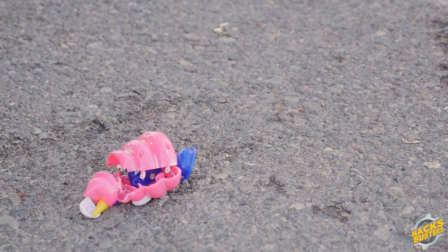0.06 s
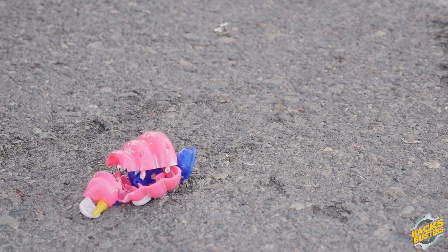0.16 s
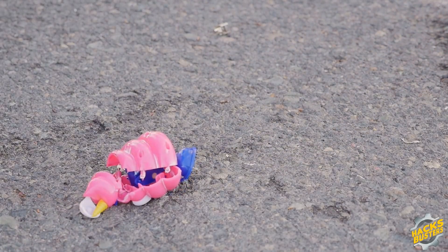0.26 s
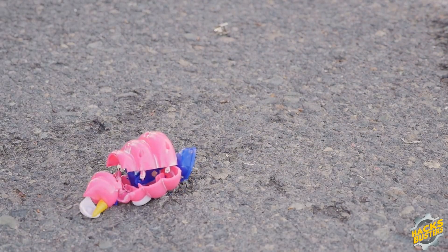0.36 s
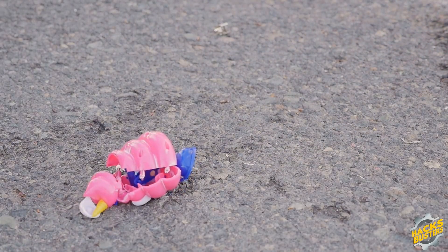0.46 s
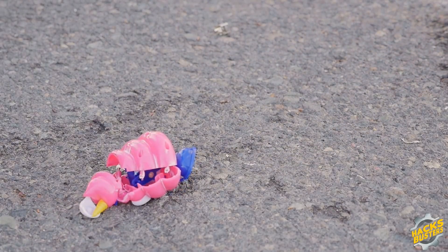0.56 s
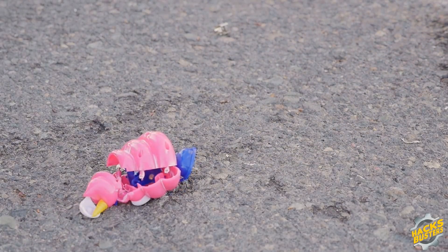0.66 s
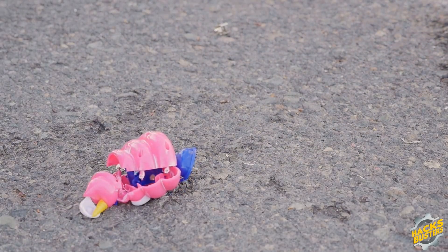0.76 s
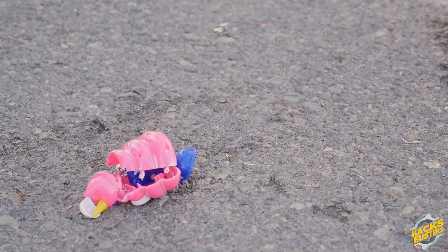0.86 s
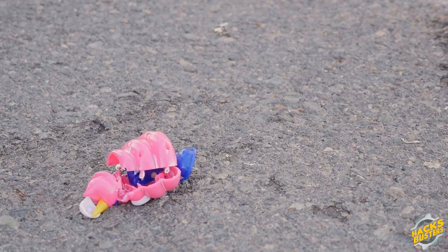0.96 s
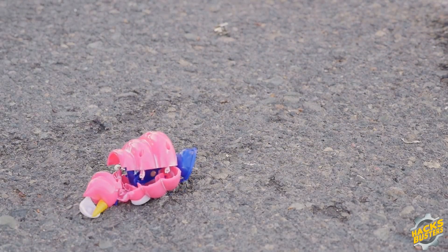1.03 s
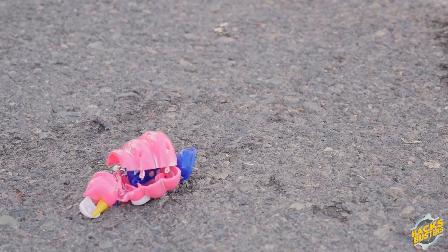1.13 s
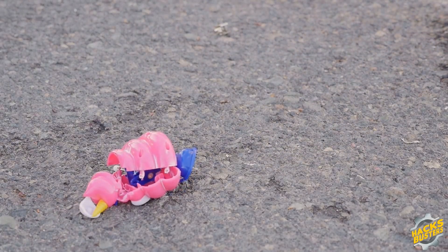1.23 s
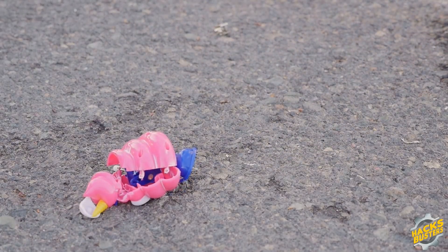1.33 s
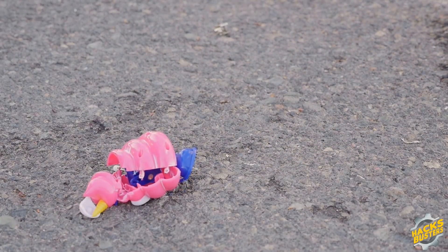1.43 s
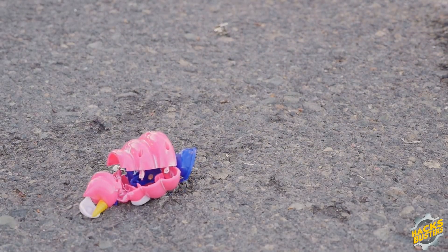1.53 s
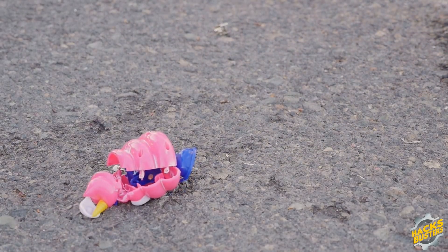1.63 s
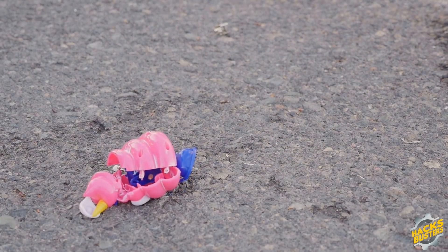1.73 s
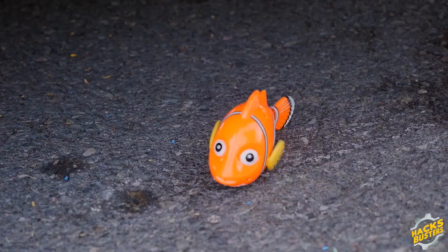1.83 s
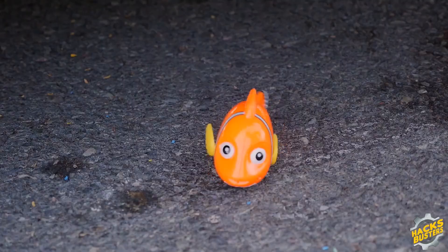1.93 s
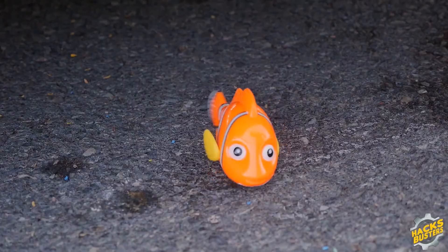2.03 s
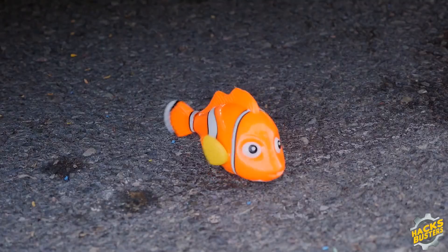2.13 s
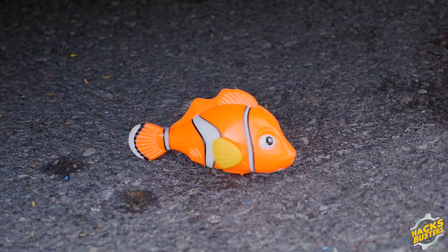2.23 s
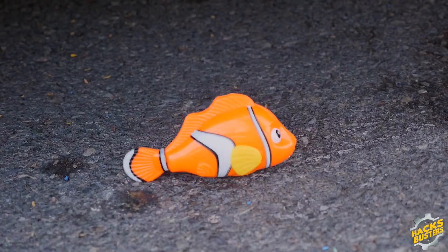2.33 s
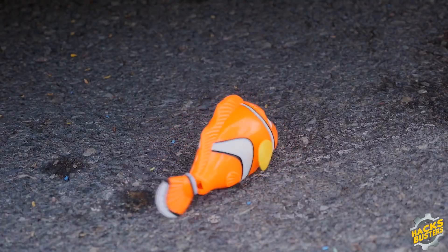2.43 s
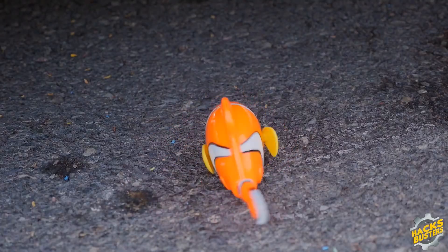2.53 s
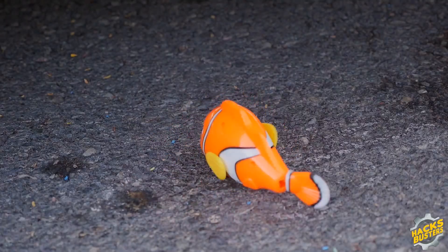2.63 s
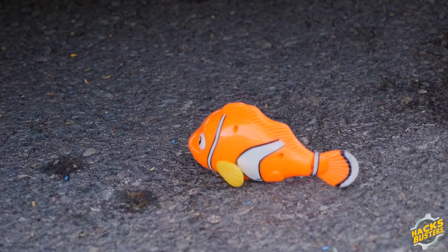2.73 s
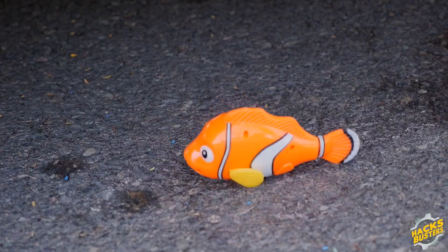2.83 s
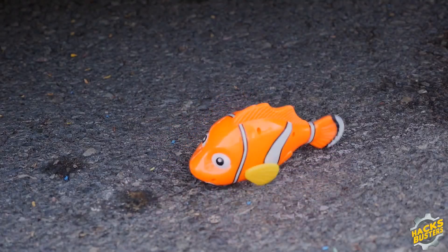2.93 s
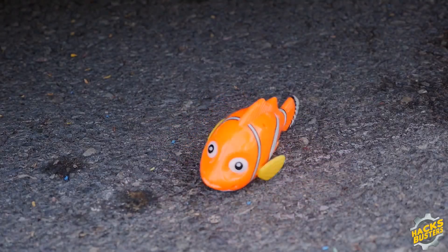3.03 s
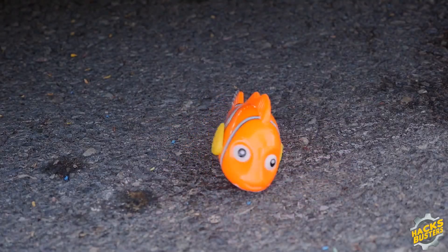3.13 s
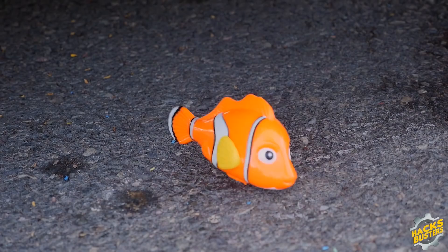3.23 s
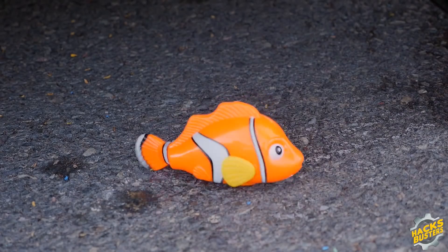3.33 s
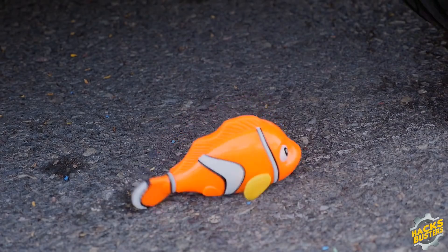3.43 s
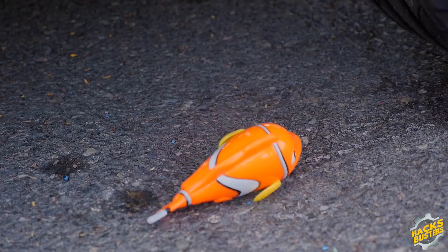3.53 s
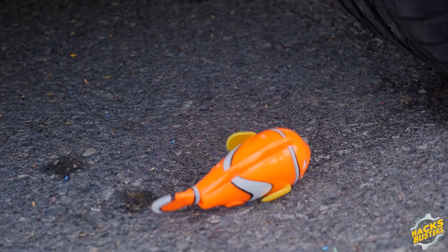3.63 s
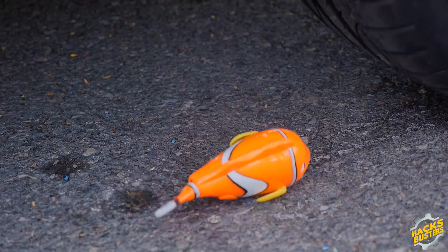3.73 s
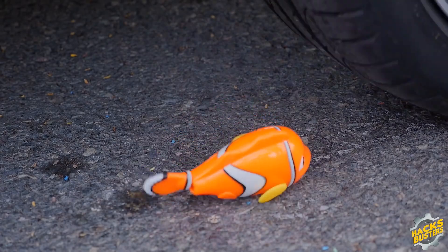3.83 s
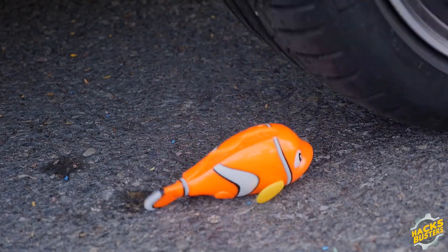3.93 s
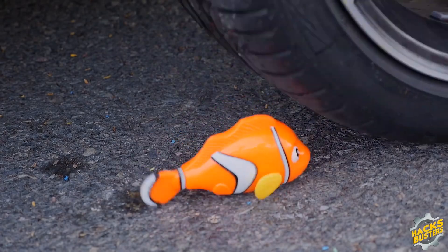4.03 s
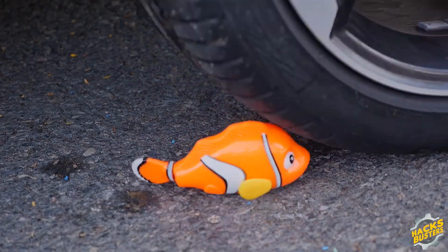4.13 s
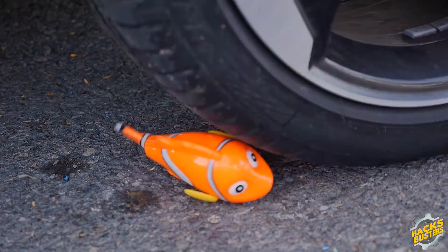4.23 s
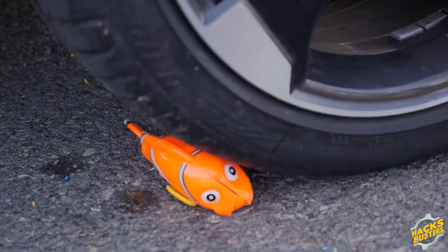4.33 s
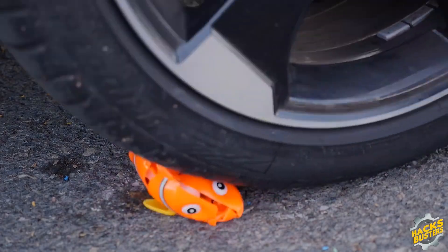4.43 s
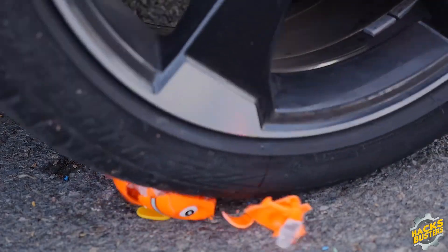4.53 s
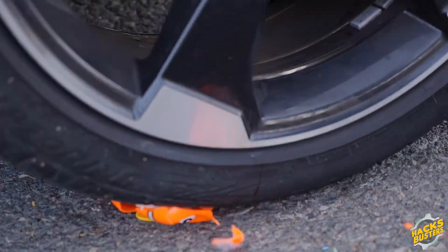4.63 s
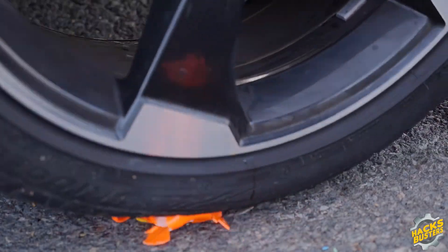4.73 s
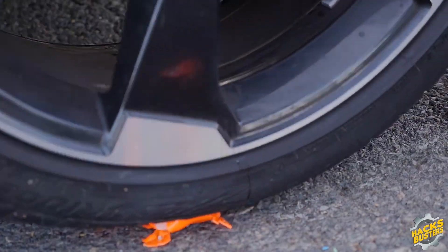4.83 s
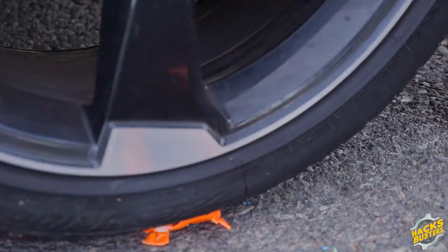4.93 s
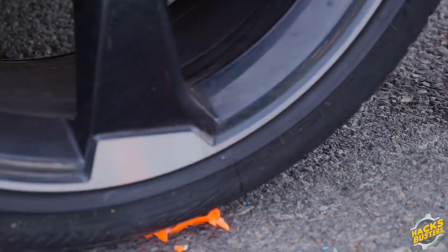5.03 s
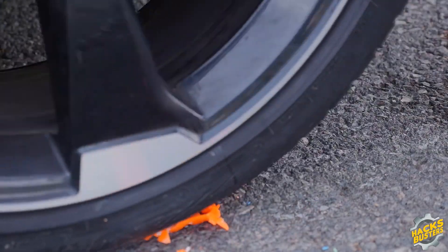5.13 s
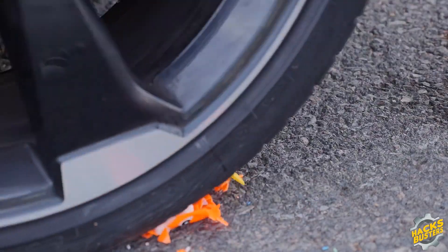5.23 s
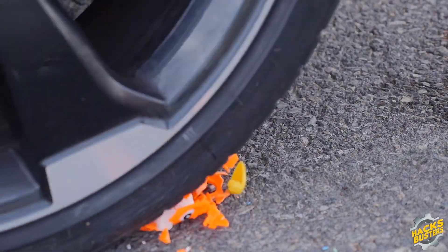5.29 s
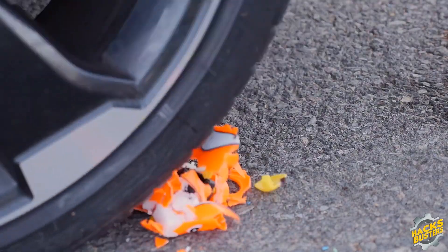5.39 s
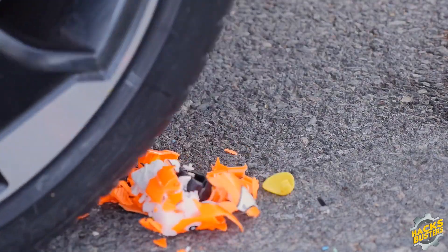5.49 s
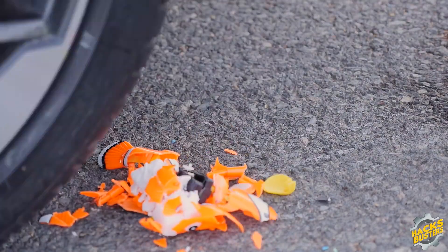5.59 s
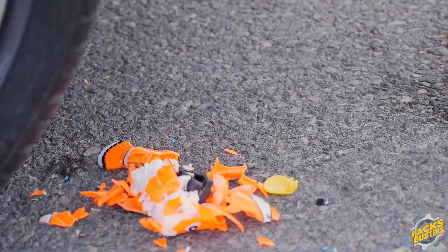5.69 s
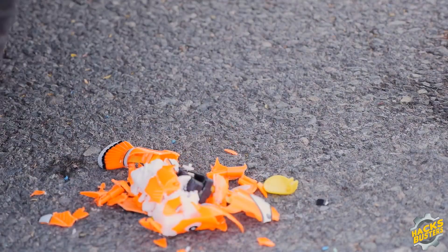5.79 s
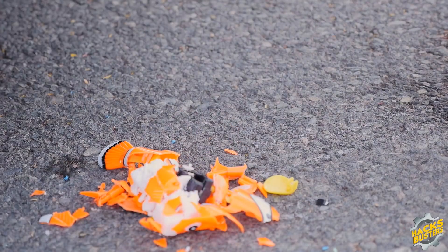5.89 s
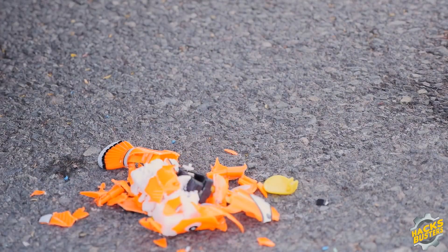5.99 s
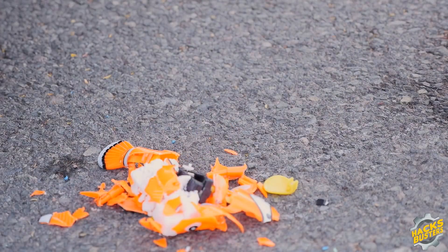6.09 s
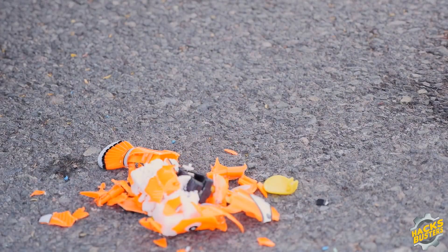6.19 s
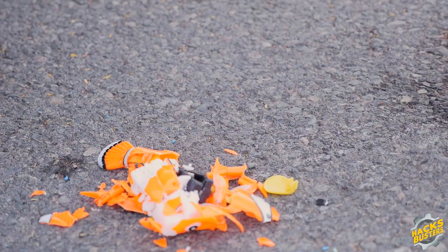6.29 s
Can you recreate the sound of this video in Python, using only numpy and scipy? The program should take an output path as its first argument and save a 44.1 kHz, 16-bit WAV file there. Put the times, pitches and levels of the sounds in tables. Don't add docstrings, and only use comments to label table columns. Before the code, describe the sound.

Close mono sound on asphalt with low distant traffic. First a fizzing high whirr of tiny gears, swelling and dipping as the toy turns, cut short. Quiet follows, then an abrupt change to a clattering clockwork toy, ticking rapidly with little slips. A tyre crushes its shell in a burst of overloaded cracks, with booming thumps and grinding grit. Last shards snap, a steel piece bounces brightly, and faint traffic remains.

```python
import sys
import numpy as np
from scipy import signal
from scipy.fft import rfft, irfft, next_fast_len
from scipy.io import wavfile
from scipy.ndimage import map_coordinates

SR = 44100
rng = np.random.default_rng(int(sys.argv[2]) if len(sys.argv) > 2 else 0)


def put_to_file(sound):
    columns = np.atleast_2d(sound).T
    safe = np.clip(columns, -1, 1)
    whole_steps = np.round(safe * 32767)
    wavfile.write(sys.argv[1], SR, whole_steps.astype(np.int16))


def volts(x):
    e = np.asarray(x, float) / 20
    return 10 ** e


N = 280035
T = np.arange(N) / SR
SCENE_CHANGE_S = 1.8915

# (frequency [Hz], level [dB per Hz])
STREET_SPECTRA = [
    [(12, -43), (20, -11.5), (189, -4.5), (1650, -13.5), (3520, -22), (3940, -21.5), (4790, -26.5), (6170, -26), (7510, -29.5), (15200, -33), (16500, -44.5)],
    [(20, -35), (60, -19.5), (155, -15), (240, -17), (600, -11), (1300, -18), (3000, -18.5), (5000, -26), (8000, -32.5), (15200, -38)],
]
STREET_DB = -43.5, -55.5
# (frequency [Hz], width [Hz], level [dB])
HUM_MODES = [(150, 25, -2), (376, 20, -9.5), (600, 40, -5.5), (1310, 60, -8.5)]

# (frequency [Hz], level [dB per Hz])
GRIT_SPECTRUM = [(290, -59), (500, -26), (761, -11), (4600, -5.5), (11600, -11), (16000, -24.5)]
# (time [s], peak [dB], rise [s per 10 dB], fall [s per 10 dB])
GRINDS = [
    (4.546, -20.5, 0.007, 0.0073),
    (4.56, -37, .015, 0.16),
    (5.4, -47.5, .1, 0.11),
    (5.435, -32.5, 0.015, 0.013),
    (5.601, -49, 0.022, 0.023),
    (5.672, -42, 0.0046, 0.012),
]

# (time [s], peak [dB], long-side ring [dB])
SCREW_BOUNCES = [(5.7384, -35, -32), (5.7598, -37, -35), (5.7967, -43, -30), (5.8074, -17, -45),
                 (5.8194, -37, -30), (5.836, -49, -30), (5.881, -36, -19), (5.888, -34, -9),
                 (5.926, -44, -20), (5.9554, -56, -5), (5.9868, -35.5, -6.5), (6.0004, -45, -6),
                 (6.0174, -48, -6), (6.0546, -51, -7)]
# (frequency [Hz], level [dB], t60 [s])
STEEL_MODES = [(5700, -15, .015), (8800, 1, 0.011), (11920, -14, .008), (13400, -9, 0.015)]
# (frequency [Hz], t60 [s])
UNDER_CAR_T60 = [(300, 0.094), (2000, 0.082), (10000, 0.0194)]

# (frequency [Hz], width [Hz], level [dB])
WHIRR_MODES = [(7700, 700, -33), (7840, 940, 3.5), (9620, 920, 7.5), (11300, 930, 1), (12600, 890, -14),
               (15200, 900, -11)]
CASE_MODES = [(3350, 690, 0), (4420, 250, 3), (5000, 380, 2.5), (6300, 1040, 2), (6600, 200, -1)]
CAVITY_MODES = [(2130, 630, 0)]
WHIRR_FACES_S = (.5, 0.48, 0.73, 0.52, .38, .4)
CASE_FACES_S = (.42, 0.68, 0.68, 0.65, .68)
# (time [s], level [dB])
SHADOWS = [
    (.275, -9),
    (.9, -11.5),
]
# (time [s], frequency [Hz])
ROAD_NULLS = [
    (.3, 7270),
    (.9, 10600),
]

# (frequency [Hz], width [Hz], level [dB])
SHELL_MODES = [(1075, 1200, -4.5), (1652, 79, 4), (1993, 230, 1.5), (2780, 630, -4), (3155, 160, -1),
               (4230, 2160, -6), (6140, 1400, -11.5)]
FIN_MODES = [(2330, 70, 0)]
BRIGHT_MODES = [(7860, 830, 0), (9300, 470, -12), (11300, 1600, -1.5), (13200, 1400, -11)]
PING_MODES = [(4877, 440, 0)]
# (time [s], level [dB])
GRIND_CURVE = [(1.89, -26.5), (2.8, -29.5), (3.6, -32.5), (3.9, -38), (4.3, -32.5), (4.43, -31.5)]
# (time [s], peak [dB])
PINGS = [(1.9914, -32), (2.0223, -13), (2.211, -14), (2.3136, -14.5), (2.411, -14), (2.597, -16),
         (2.8714, -17), (3.083, -15), (3.1926, -13.5), (3.2735, -19.5), (3.292, -7), (3.5054, -15),
         (3.5475, -8), (3.6272, -17.5), (3.768, -11.5), (3.8986, -10.5), (4.011, -14.5), (4.047, -13)]
# (first [s], last [s], strike [dB], belly [dB])
TICK_RUNS = [(1.8972, 2.083, -11.5, -15.5), (2.1033, 2.1933, -12.5, -16), (2.221, 2.3612, -13, -20),
             (2.381, 2.5426, -12.5, -16), (2.563, 2.7182, -12, -15.5), (2.7442, 2.81, -11, -17.5),
             (2.836, 2.8822, -9, -17), (2.909, 2.9765, -12.5, -20.5), (3.0018, 3.097, -11, -23),
             (3.126, 3.1921, -13, -25), (3.2286, 3.2894, -14.5, -28), (3.3276, 3.4182, -11, -20),
             (3.443, 3.505, -12, -19.5), (3.53, 3.549, -11.5, -32), (3.5841, 3.6658, -13.5, -24),
             (3.694, 3.694, -11.5, -30), (3.7253, 3.772, -10, -49), (3.809, 3.809, -13, -49),
             (3.8485, 3.8482, -9.5, -46), (3.8793, 3.9371, -14, -33), (3.9664, 4.0118, -10.5, -20),
             (4.0305, 4.0483, -14, -43), (4.086, 4.1771, -13, -16.5), (4.2146, 4.2152, -15.5, -34),
             (4.2441, 4.3589, -11.5, -15), (4.376, 4.3939, -18.5, -17.5)]

# (time [s], peak [dB], thump [dB], shard [Hz], splinter tail [dB])
CRACKS = [(4.426, 0.5, -10.5, 6800, -10.5), (4.4371, 3, -20, 4730, -19), (4.4633, -5, -28, 2370, -16.5),
          (4.474, -2, -13, 4430, -12), (4.5523, -5, -12.5, 2110, -11), (4.5804, -11.5, -14, 10530, -12),
          (4.6045, -7, -26, 6100, -8.5), (4.6087, -3, -15, 6660, -19.5), (4.641, -6.5, -7, 8100, -12),
          (4.699, -12, -11, 2600, -16), (4.707, -6.5, -8.5, 5300, -15), (4.7354, -6.5, -7.5, 7340, -24),
          (4.81, -4, -0.5, 2280, -10.5), (4.9035, -12.5, -6, 12500, -12), (4.971, -2.5, -10, 5200, -13.5),
          (4.9945, -6, -34.5, 8300, -13.5), (5.0437, -2, -3.5, 7800, -27.5), (5.053, -5, -5.5, 5460, -29),
          (5.3045, -1.5, -18.5, 12200, -62), (5.318, -5.5, -10.5, 2500, -16),
          (5.3955, -8, -38, 4860, -13.5)]
# (time [s], peak [dB], shard [Hz], body knock [dB])
CHIPS = [(4.516, -19.5, 2300, -4), (4.5281, -17, 2280, -7), (4.5422, -10, 6070, -20),
         (4.5978, -12, 2330, -6), (4.6726, -20, 5100, -11), (4.683, -17, 6440, -4), (4.69, -20, 6310, -9),
         (4.7576, -28.5, 2800, -3.5), (4.7645, -16, 4900, -8), (4.7786, -25, 4670, -2),
         (4.7872, -25, 2000, -2), (4.924, -29, 6520, -19), (4.9396, -26.5, 4670, -15),
         (4.9566, -30, 6640, -15), (5.0789, -36, 5170, -18), (5.0985, -35, 6200, -25),
         (5.117, -39, 7970, -20), (5.169, -43, 2500, 8.5), (5.2015, -37, 5500, -12), (5.216, -25, 3800, -4),
         (5.2344, -30, 2330, 9), (5.2593, -33, 11300, -12), (5.289, -34, 7370, -20),
         (5.3266, -28, 2800, -8), (5.3745, -19, 4100, -6), (5.4315, -20.5, 8210, -17),
         (5.505, -27, 2450, -16), (5.587, -27.5, 6650, -20), (5.6036, -32, 4820, -11)]
# (frequency [Hz], level [dB])
SNAP_SPECTRUM = [(150, -55.5), (600, -25.5), (1500, -5), (3000, 0), (11000, -1.5), (16000, -6.5)]
# (frequency [Hz], level [dB], t60 [s])
TYRE_MODES = [(208, -6, 0.74), (218, -1, 0.48), (378, -6, 0.96), (410.5, 0.5, 0.33), (547, -12, .5),
              (626, 0.5, 0.47), (813, -4, 0.77), (870, -10, .4), (1020, -4, 0.27)]


def unit(x):
    return x / np.sqrt(np.mean(x ** 2) + 1e-20)


def along(points, hz):
    f, v = np.transpose(points)
    return np.interp(np.log(hz + 1), np.log(f + 1), v)


def wobble(rate_hz):
    knots = rng.standard_normal(int(N * rate_hz / SR) + 4)
    return map_coordinates(knots, [T * rate_hz])


def lumps(spike_db, rate_hz):
    return unit(volts(spike_db * wobble(rate_hz)))


def filtered(x, response):
    m = next_fast_len(len(x) + 8192)
    return irfft(rfft(x, m) * response(np.fft.rfftfreq(m, 1 / SR)), m)[:len(x)]


def modes(table):
    def response(f):
        total = 0
        for k, (hz, width_hz, db) in enumerate(table):
            damping = 1j * f * width_hz
            total = total + (-1) ** k * volts(db) * damping / (hz * hz - f * f + damping)
        return total
    return response


def colour(spectrum):
    return lambda f: volts(along(spectrum, f))


def low_cut(hz, order):
    return lambda f: (f / (f - 1j * hz)) ** order


def bursts(times_s, dbs, rise_s, t60_s):
    train, t = np.zeros(N), np.arange(SR // 10) / SR
    np.add.at(train, np.round(times_s * SR).astype(int), volts(dbs))
    return signal.fftconvolve(train, (1 - np.exp(-t / rise_s)) * volts(-60 * t / t60_s))[:N]


def facing(faces_s, mean_db, swing_db, turn_s):
    return mean_db + swing_db * np.cos(2 * np.pi * (T - faces_s) / turn_s)


def drifting(shape, table, drift_db, rate_hz, turns_db=None):
    knots = np.arange(int(T[-1] * rate_hz) + 2)
    if turns_db is None:
        turns_db = np.zeros(len(table))
    total = 0
    for mode, turn_db in zip(table, turns_db):
        swell_db = drift_db * np.interp(T * rate_hz, knots, rng.standard_normal(len(knots)))
        noise = shape * rng.standard_normal(N)
        total = total + volts(swell_db + turn_db) * filtered(noise, modes([mode]))
    power = sum(np.pi * width_hz / SR * volts(2 * db) for _, width_hz, db in table)
    return total / np.sqrt(power)


def street():
    places = []
    for spectrum, db in zip(STREET_SPECTRA, STREET_DB):
        noise = unit(filtered(rng.standard_normal(N), colour(spectrum)))
        places.append(volts(db + 0.1 * wobble(0.84)) * noise)
    before, after = places
    shield = np.interp(T, (5.2, 5.5), [0.45, 0])
    after = after - shield * filtered(after, lambda f: f > 900)
    hum = volts(-66) * unit(filtered(rng.standard_normal(N), modes(HUM_MODES)))
    return np.where(T < SCENE_CHANGE_S, before, hum + after * volts(1.54 * (T[-1] - T)))


def crunch():
    tread_on_s, tread_off_s, roll_off_db_per_s = 4.42, 5.56, 80
    level = volts(-55.5 - roll_off_db_per_s * np.clip(T - tread_off_s, 0, 9))
    for s, db, rise_s, fall_s in GRINDS:
        level = level + volts(db - 10 * np.where(T < s, (s - T) / rise_s, (T - s) / fall_s))
    grains = lumps(spike_db=4.5, rate_hz=600) * rng.standard_normal(N)
    return (T > tread_on_s) * level * unit(filtered(grains, colour(GRIT_SPECTRUM)))


def screw():
    out, t = np.zeros(N + SR), np.arange(SR // 10) / SR
    for s, db, long_db in SCREW_BOUNCES:
        ring = 0.5 * volts(-60 * t / 0.007) * np.diff(rng.standard_normal(len(t) + 2), 2)
        for hz, level_db, t60_s in STEEL_MODES:
            d = rng.standard_normal()
            tone = np.sin(2 * np.pi * hz * volts(0.37 * d) * t)
            ring = ring + volts(level_db + 4.9 * d - 60 * t / t60_s) * tone
        ring = ring + volts(long_db + 8 - 60 * t / 0.045) * np.sin(2 * np.pi * 7400 * t)
        out[round(s * SR):][:len(t)] += volts(db - 8.5) * ring * (1 - np.exp(-t / 0.00014))
    return out[:N]


def under_car(x):
    hz, t, z = signal.stft(rng.standard_normal(SR // 6), SR, nperseg=128)
    decay = volts(-60 * t / along(UNDER_CAR_T60, hz)[:, None])
    tail = signal.istft(z * decay, SR, nperseg=128)[1]
    return signal.fftconvolve(np.pad(x, (130, 0)), tail / np.linalg.norm(tail))[:N]


def spinner():
    turn_s, side_swing_db = 0.7, 1.5
    stop_s, stop_db_per_s, sag_db_per_s = 1.398, 1250, 1.5
    shadow_s, case_shade = 0.058, 0.31
    null_hz, null_s, null_depth = 700, 0.16, 0.63
    shade_db = sum(db * np.exp(-abs(T - s) / shadow_s) for s, db in SHADOWS)
    whirr_db = -21.5 + shade_db - stop_db_per_s * np.clip(T - stop_s, 0, 1)
    case_db = facing(0.7, -9.5, 2, turn_s) + case_shade * shade_db
    cavity_db = facing(0.62, -25, 3, turn_s)
    whirr_turns_db = [facing(s, 0, side_swing_db, turn_s) for s in WHIRR_FACES_S]
    case_turns_db = [facing(s, 0, side_swing_db, turn_s) for s in CASE_FACES_S]

    teeth = lumps(spike_db=-1.0, rate_hz=610)
    whirr = drifting(teeth, WHIRR_MODES, 1.3, 6.9, whirr_turns_db)
    whirr = filtered(whirr, low_cut(5000, 3))
    case = drifting(teeth, CASE_MODES, 1.1, 9, case_turns_db)
    case = volts(case_db) * filtered(case, low_cut(2500, 2))
    cavity = drifting(teeth, CAVITY_MODES, 0.8, 8)
    cavity = volts(cavity_db) * filtered(cavity, modes([(2100, 600, 0)]))
    flutter_db = 0.5 * wobble(24.8)
    toy = volts(whirr_db + 3.5 - sag_db_per_s * T + flutter_db) * (whirr + case + cavity)

    cancelled = 0
    for s, hz in ROAD_NULLS:
        window = np.exp(-((T - s) / null_s) ** 4)
        cancelled = cancelled + window * filtered(toy, modes([(hz, null_hz, 0)]))
    return toy - null_depth * cancelled


def ticks():
    tick_s, last_db = 0.022, -1
    rows = []
    for first, last, strike_db, belly_db in TICK_RUNS:
        for s in np.linspace(first, last, 1 + round((last - first) / tick_s)):
            rows.append((s, strike_db + last_db * (s == last > first), belly_db))
    s, strike_db, belly_db = np.transpose(rows)
    strike_dice, belly_dice, rebound_dice = rng.standard_normal((3, len(s)))
    rebound_db = strike_db - 0.5 + 1 * rebound_dice
    return s, strike_db + 1.3 * strike_dice, belly_db + 3 * belly_dice, rebound_db


def crawler():
    s, strike_db, belly_db, rebound_db = ticks()
    rebound_s = s + 0.0097 + 0.002 * rng.standard_normal(len(s))
    grind_db = np.interp(T, *np.transpose(GRIND_CURVE))
    grinding = (T > SCENE_CHANGE_S) * (T < GRIND_CURVE[-1][0])
    contact = volts(grind_db + 2.1 * wobble(60)) * grinding
    contact = contact + bursts(s, strike_db, rise_s=0.0011, t60_s=0.031)
    contact = contact + bursts(rebound_s, rebound_db - 3.5, rise_s=0.0026, t60_s=0.017)
    rattle = lumps(spike_db=2.2, rate_hz=900) * contact

    fin_db = facing(3.38, -8, 4, turn_s=1.16)
    shell = drifting(rattle, SHELL_MODES, 1.5, 5.166)
    fin = volts(fin_db) * drifting(rattle, FIN_MODES, 1.5, 9)
    bright_db = -13.5 - 0.53 * (grind_db + 31.5)
    fizz = volts(bright_db) * drifting(rattle, BRIGHT_MODES, 6.0, 5.5)

    ping_s, ping_db = np.transpose(PINGS)
    gear_hits = bursts(ping_s, ping_db + 5, rise_s=0.0022, t60_s=0.049) + volts(-11.5) * rattle
    ping = filtered(drifting(gear_hits, PING_MODES, 2.0, 2.9), modes([(4850, 420, 0)]))

    push = bursts(s + 0.00201, belly_db + 25, rise_s=0.00018, t60_s=0.0015)
    push = push + 1.65 * rng.standard_normal(N) * contact
    rock_s, rock_lasts_s = 3.36, 0.4
    belly_hz = np.interp(T, [rock_s - rock_lasts_s / 2, rock_s + rock_lasts_s / 2], (863, 776))
    high = np.clip((belly_hz - 740) / 130, 0, 1)
    belly = filtered(push * high, modes([(873, 101, 7.5), (1130, 83, -10.0)]))
    belly = belly + filtered(push * (1 - high), modes([(767, 79, 8.5), (1094, 270, -9)]))

    toy = filtered(shell + fin + fizz + ping + belly, low_cut(420, 3))
    return filtered(toy, lambda f: 1 / (1 + (f / 13500) ** 6))


def fractures():
    rows = []
    for s, db, thump_db, hz, tail_db in CRACKS:
        rows.append((s, db, thump_db, hz, tail_db, -7.5 - 5.5 * np.log2(hz / 2500)))
    for s, db, hz, body_db in CHIPS:
        rows.append((s, db, -20.5, hz, -18.5, body_db))
    return rows


def tyre_ring():
    t, ring = np.arange(SR) / SR, 0
    for k, (hz, db, t60_s) in enumerate(TYRE_MODES):
        ring = ring + (-1) ** k * volts(db - 60 * t / t60_s) * np.sin(2 * np.pi * hz * t)
    return ring * (1 - np.exp(-t / 0.004))


def cracks():
    size = SR // 10
    t = np.arange(size) / SR
    snap, knock, thump, blows = np.zeros((4, N + size))
    click = volts(3.5) * (np.arange(size) == round(0.0004 * SR))
    burst_shape = (1 - np.exp(-t / 0.0004)) * volts(-60 * (t / 0.0064) ** 1.45)
    for s, db, thump_db, hz, tail_db, body_db in fractures():
        at, noise = round(s * SR), rng.standard_normal(size)
        burst = burst_shape / np.sqrt(np.sum((noise * burst_shape) ** 2) / np.sum(burst_shape ** 2))
        split = noise * (0.8 * burst + volts(tail_db - 60 * t / 0.04)) - click
        shard = filtered(split, modes([(hz, 0.14 * hz, 4.5)]))
        snap[at:at + size] += volts(db + 0.5) * (split + shard)
        knock[at:at + size] += volts(db + body_db + 9.5) * split
        tone = np.sin(2 * np.pi * 680 * volts(1.25 * noise[1]) * t)
        thump[at:at + size] += volts(db + thump_db + 2.5) * tone * volts(-60 * t / 0.011)
        blows[at] = volts(db + thump_db)

    flat_s = 4.68
    hollow = snap * (np.arange(N + size) < flat_s * SR)
    body = thump + volts(-38.0) * signal.fftconvolve(blows, tyre_ring())[:N + size]
    body = body + filtered(hollow, modes([(254.6, 30, 7.4)]))
    body = body + filtered(knock, modes([(1386, 1340, 0.023), (2280, 57, 0.0047)]))
    return (filtered(snap, colour(SNAP_SPECTRUM)) + filtered(body, low_cut(150, 4)))[:N]


def scene():
    breaking = cracks() + screw()
    mono = street() + crunch() + spinner() + crawler()
    mono = mono + breaking + volts(-17.5) * under_car(breaking)
    mono = filtered(mono, colour([(15600, 0), (16100, -29), (16400, -50.5)]))
    return np.array([mono, mono])


def band_limit(x):
    return signal.sosfilt(signal.butter(12, 16840, fs=SR, output="sos"), x)


def record(dry):
    clipped = np.clip(dry, -1, 1)
    return band_limit(clipped)


dry = scene()
out = record(dry)
put_to_file(out)
```